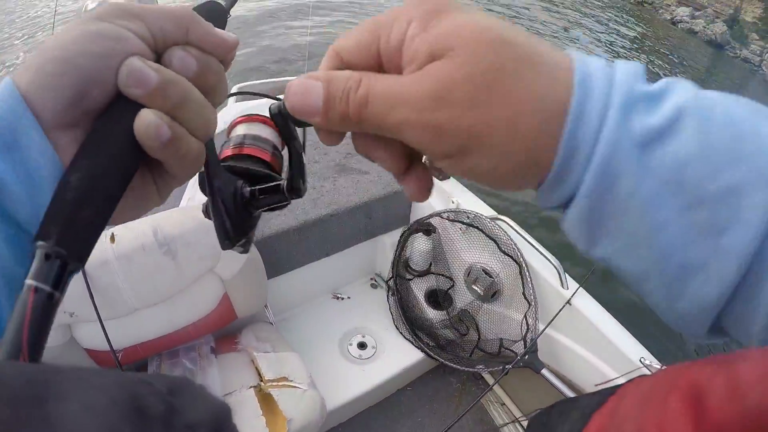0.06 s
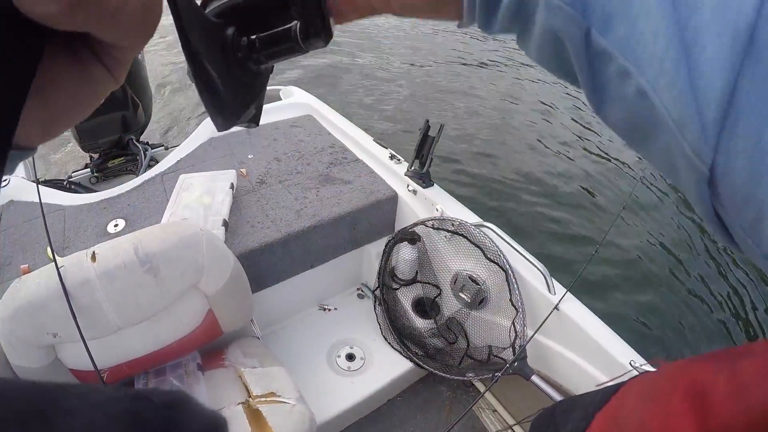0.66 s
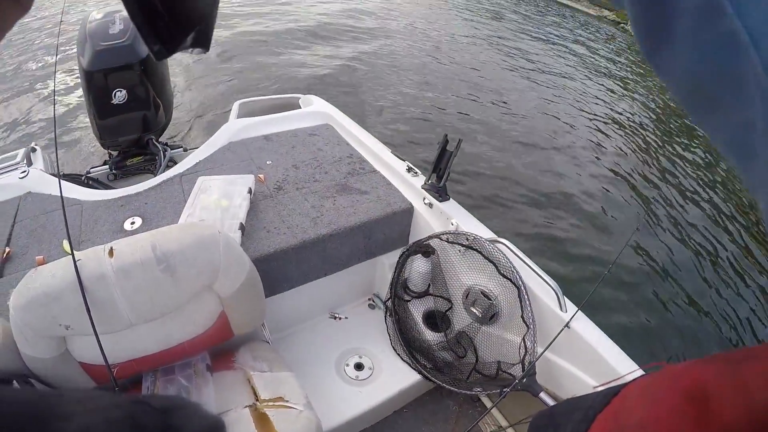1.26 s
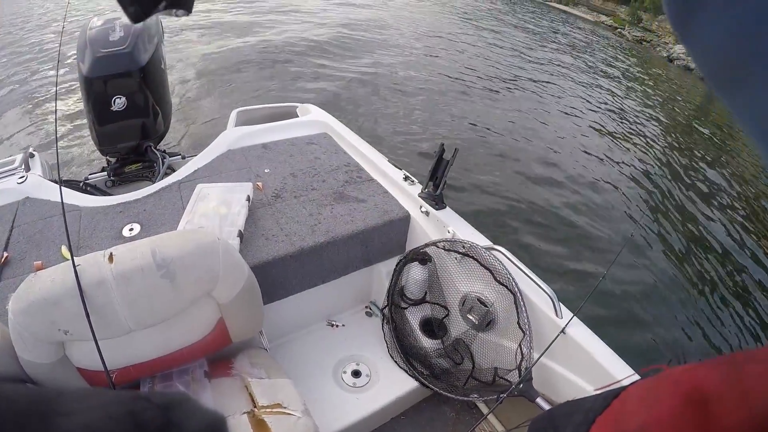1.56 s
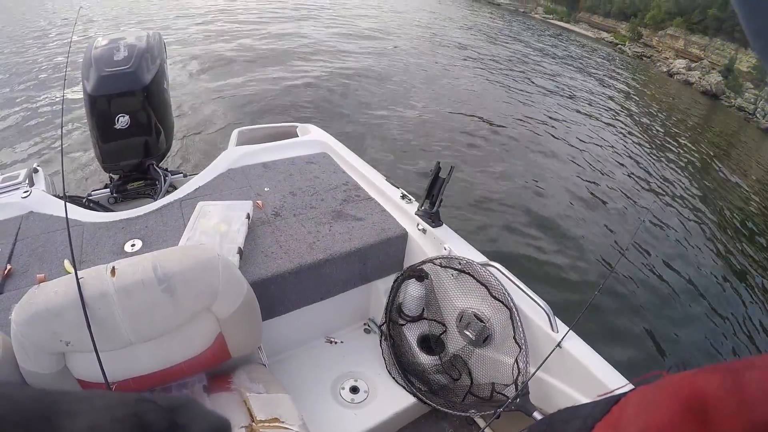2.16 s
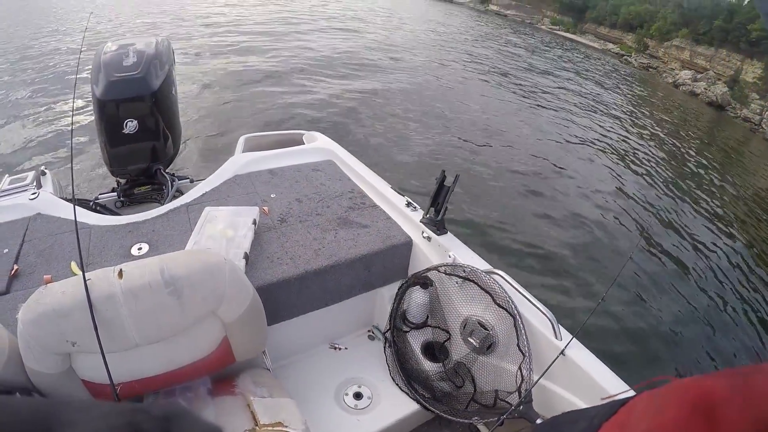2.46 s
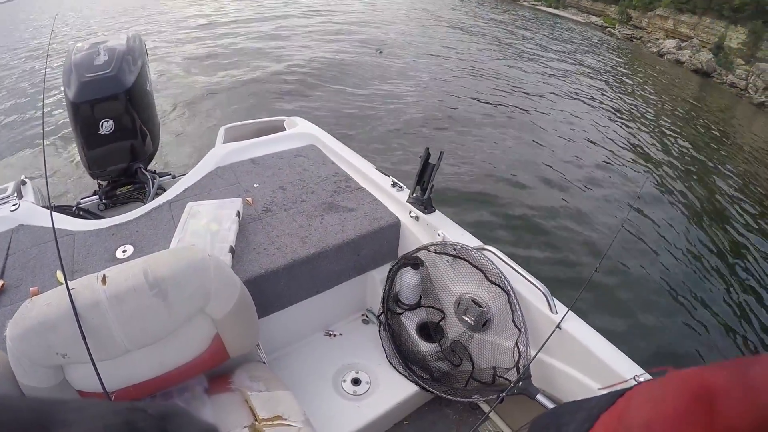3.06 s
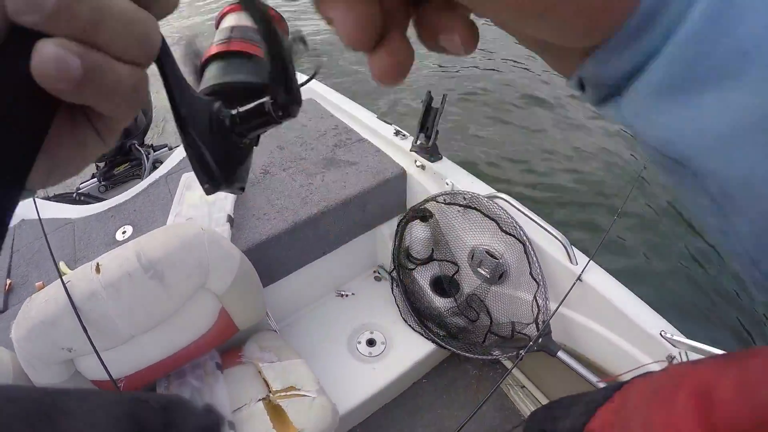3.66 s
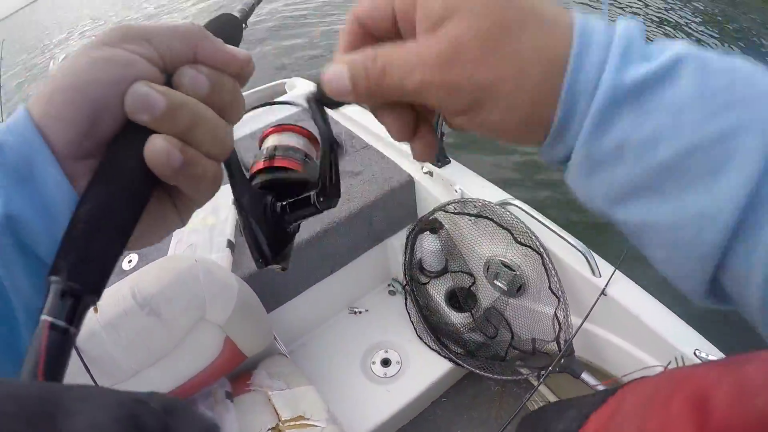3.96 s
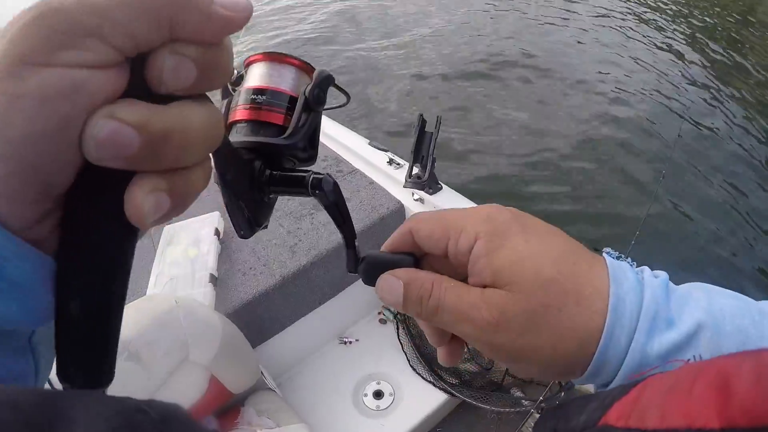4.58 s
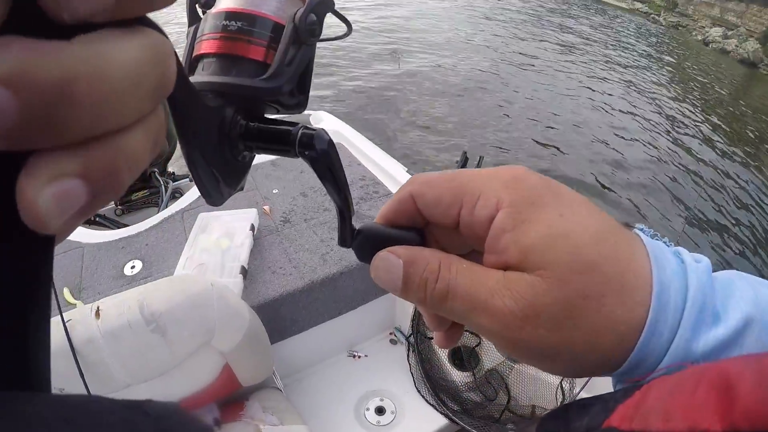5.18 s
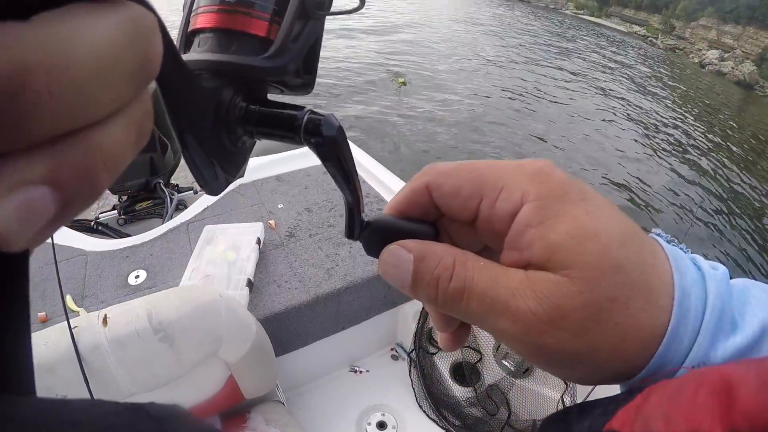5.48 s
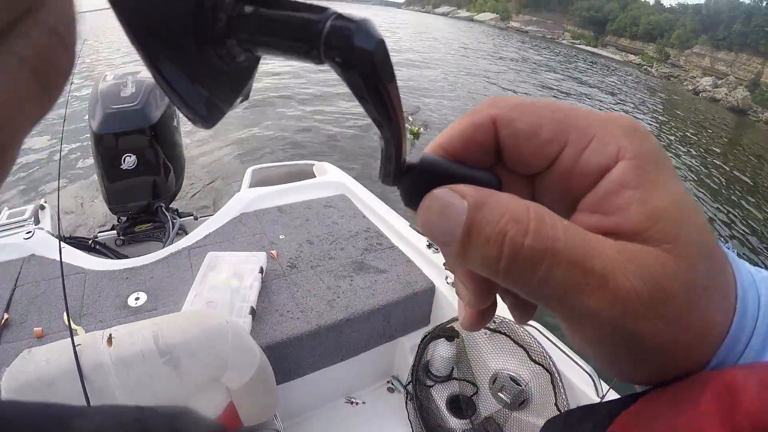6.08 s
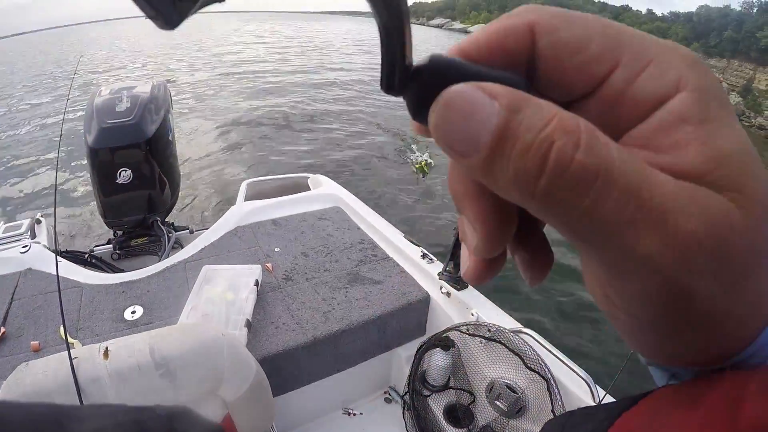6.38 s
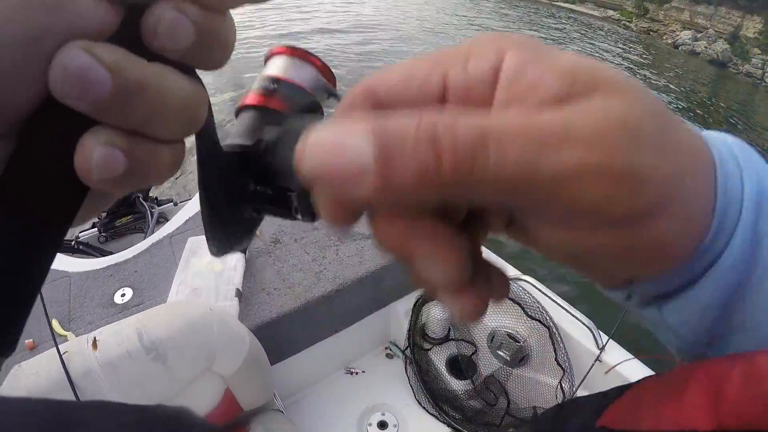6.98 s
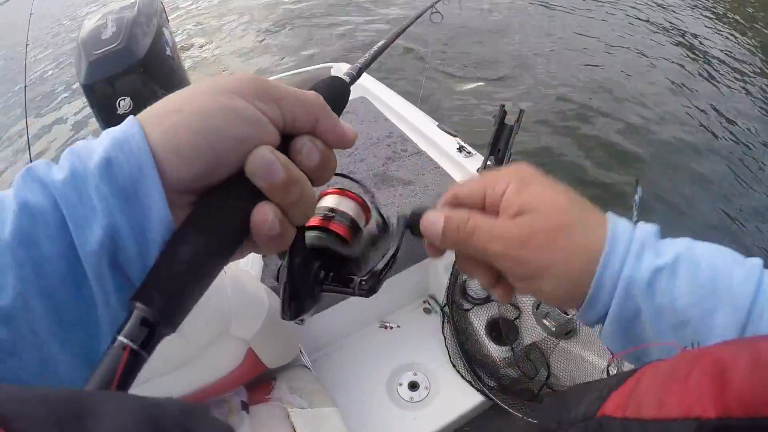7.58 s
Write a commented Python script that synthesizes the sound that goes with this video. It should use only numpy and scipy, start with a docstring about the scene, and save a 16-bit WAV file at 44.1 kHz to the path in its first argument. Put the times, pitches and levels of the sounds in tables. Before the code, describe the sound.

Close clicks and knocks from a fishing rod and reel over a slow outboard motor's steady low hum, with waves lapping and thumping the hull.

```python
"""Reeling in from a slow boat

A small fishing boat creeps over calm water: the outboard's exhaust pulses drone and burble, ripples
lap, waves slap the hull and air buffets the microphone. Close by, an angler cranks a spinning reel in
spells: gears and line whirr, small metal parts clink, the sprung bail snaps shut, and the rod grip
ticks and knocks."""
import sys
import numpy as np
from scipy import signal
from scipy.fft import rfft, irfft, next_fast_len
from scipy.io import wavfile
from scipy.ndimage import uniform_filter1d

SR = 44100
rng = np.random.default_rng(int(sys.argv[2]) if len(sys.argv) > 2 else 0)


def to_wav(sig):
    """Store sig (one row per channel, or 1-D mono) as 16-bit WAV at the path in sys.argv[1].

    Samples outside -1..1 are clipped; the rate is SR.
    """
    pcm = np.clip(np.atleast_2d(sig), -1, 1) * 32767
    pcm = np.round(pcm).astype(np.int16)
    wavfile.write(sys.argv[1], SR, pcm.T)  # frames by channels


N = 345744
TIME = np.arange(N) / SR
HIT_TIME = TIME[:SR // 2]   # half a second for each struck sound
TURNS_PER_S = 2.7   # pace of the reel's handle
RESTING_DB = -75   # whirr of the reel barely turning between spells

# Waves slapping the hull. Each row: start in seconds, level of the plop in dB, pitch of the trapped
# air in Hz, length in seconds, level of the smaller pockets in dB relative to the plop.
SLAP_WAVES = [(0.765, -42.5, 419, 0.035, 5), (1.204, -36, 288, 0.014, -7), (1.647, -46, 414, 0.046, 6),
              (2.278, -38, 404, 0.0105, 1), (3.367, -29.5, 255, 0.039, -8), (3.893, -22.5, 456, 0.026, 2.5),
              (5.046, -33, 290, 0.027, 3.5), (5.063, -35.5, 314, 0.016, 2.5),
              (5.484, -32.5, 280.6, 0.024, 0.5), (6.495, -40, 261, 0.041, 8), (6.935, -46, 467, 0.029, 0),
              (7.747, -32, 241, 0.04, 4.5)]


def from_db(db):
    """Decibels to gain."""
    return 10 ** (np.asarray(db) / 20)


def rms_one(x):
    """Scale to rms 1."""
    return x / np.sqrt(np.mean(x ** 2) + 1e-20)


def peak_one(x):
    """Scale so that the loudest millisecond has rms 1."""
    return x / np.sqrt(uniform_filter1d(x ** 2, size=44).max() + 1e-20)


def in_time(rows):
    """Join (seconds, value) rows by straight lines."""
    return np.interp(TIME, *np.transpose(rows))


def swells(rows):
    """Bell-shaped rises and falls from (centre in seconds, length in seconds, dB) rows."""
    return sum(from_db(db) * np.exp(-2 * ((TIME - s) / length) ** 2) for s, length, db in rows)


def held(start, end, attack, release):
    """Envelope that rises from start, holds until end and then falls; all in seconds."""
    return np.clip((TIME - start) / attack, 0, 1) * np.clip(1 - (TIME - end) / release, 0, 1)


def dying(t60):
    """Envelope that loses 60 dB in t60 seconds."""
    return np.exp(-np.log(1000) * np.minimum(HIT_TIME / t60, 5))


def drift(rate_hz):
    """Smooth random wander with spread 1."""
    hop, run_in = 40, 2000
    pole = np.exp(-2 * np.pi * rate_hz * hop / SR)
    noise = rng.standard_normal(N // hop + run_in + 2)
    slow = signal.lfilter([1], [1, -2 * pole, pole * pole], noise)[run_in:]
    return np.interp(np.arange(N) / hop, np.arange(len(slow)), rms_one(slow))


def grains(per_s, spread_db):
    """Random clicks of uneven size."""
    sizes = from_db(spread_db * np.minimum(rng.exponential(1, N), 4)) * rng.choice([-1, 1], N)
    return sizes * (rng.random(N) < per_s / SR)


def cut(x, hz, kind, order):
    """Butterworth high- or low-pass."""
    return signal.sosfilt(signal.butter(order, hz, kind, fs=SR, output="sos"), x)


def coloured(x, spectrum):
    """Equalise x along (Hz, dB) points, rolling off below the lowest; rms 1."""
    size = next_fast_len(len(x))
    log_hz = np.log(np.fft.rfftfreq(size, 1 / SR) + 1e-9)
    points_hz, db = np.transpose(sorted(spectrum))
    roll_off = np.minimum(np.exp(log_hz) / points_hz[0], 1) ** 2
    curve = from_db(np.interp(log_hz, np.log(points_hz), db))
    return rms_one(irfft(rfft(x, size) * roll_off * curve, size)[:len(x)])


def resonate(x, hz, width_hz):
    """One resonance with gain 1 at its peak."""
    radius = np.exp(-np.pi * width_hz / SR)
    feedback = [1, -2 * radius * np.cos(2 * np.pi * hz / SR), radius ** 2]
    return signal.lfilter(np.array([1, 0, -1]) * (1 - radius ** 2) / 2, feedback, x + 1e-18)


def ringing(modes, uneven_db):
    """Struck modes from (Hz, dB, t60 in seconds) rows, each with a random sign and uneven strength."""
    out = np.zeros(len(HIT_TIME))
    for hz, db, t60 in modes:
        strength = rng.choice([-1, 1]) * from_db(db + uneven_db * rng.standard_normal())
        out += strength * dying(t60) * np.sin(2 * np.pi * hz * HIT_TIME)
    return out


def contact(body, t60):
    """A brief rough contact heard through slightly detuned resonances: (Hz, width in Hz, dB) rows."""
    force = rng.standard_normal(len(HIT_TIME)) * dying(t60)
    out = np.zeros(len(HIT_TIME))
    for hz, width, db in body:
        detune = 1 + 0.011 * rng.uniform(-0.71, 1)
        out += from_db(db) * rms_one(resonate(force, hz * detune, width))
    return peak_one(out)


def add(out, start_s, sound):
    """Mix a sound in at its start time."""
    at = max(round(start_s * SR), 0)
    out[at:at + len(sound)] += sound[:N - at]


def wind():
    """Air buffets the microphone: soft lumps of low turbulence over a light breeze."""
    # Buffets. Each row: centre in seconds, length in seconds, level in dB.
    buffets = [(1.426, 0.2, -34.5), (3.05, 0.094, -40), (4.999, 0.098, -33), (7.17, 0.17, -31)]
    breeze_db = -47
    rumble = cut(rng.standard_normal(N), 47.4, "low", order=6)
    rumble = rms_one(cut(rumble, 20, "high", order=2))
    return np.hypot(swells(buffets), from_db(breeze_db)) * rumble


def water():
    """An uneven wash with flurries of small, briefly ringing bubbles; it swells around each slap."""
    # Colour of the water along the hull. Each row: frequency in Hz, spectral level in dB.
    wash_colour = [(150, -19), (300, 7), (600, -2.5), (950, 0.5), (1120, -7), (1400, -10.5), (2200, -13),
                   (3600, -17), (4200, -25), (6400, -24), (7300, -30.5), (10500, -31), (12500, -36),
                   (15000, -57)]
    # Fader curve of the water. Each row: time in seconds, level in dB.
    wash_fader = [(0.0, -47.5), (0.94, -47.5), (1.57, -48.5), (2.8, -48.5), (3.55, -45.5), (4.2, -45.5),
                  (4.37, -49), (4.67, -45.5), (5.26, -47), (6.0, -45), (6.66, -43), (7.27, -46.5),
                  (7.84, -44)]
    surge_s, under_slap_db, surge_max_db = 0.029, 18.5, -45
    flicker = from_db(1.7 * drift(18))
    wash = coloured(rng.standard_normal(N) * flicker, wash_colour)
    flurries = from_db(1.8 * drift(12))
    bubbles = sum(resonate(grains(11, spread_db=2.5), hz, hz / 12) for hz in np.geomspace(280, 1120, 16))
    fizz = rms_one(cut(flurries * bubbles, 1060, "low", order=4))
    surges = swells([(s, surge_s, min(db - under_slap_db, surge_max_db)) for s, db, *_ in SLAP_WAVES])
    lapping = from_db(in_time(wash_fader) + drift(5))
    return np.hypot(lapping, surges) * (from_db(-2.5) * wash + from_db(-6) * fizz)


def hull_slaps():
    """Each wave traps air: one pocket plops, smaller ones follow; heavy waves set the hull booming."""
    # Smaller air pockets. Each row: delay as a share of the slap's length, pitch ratio, level in dB.
    pockets = [(0, 1.1, 2), (.02, 1.5, -14), (.05, 2.0, -4.5), (.2, 1.5, -5.5), (.35, 0.74, 0.5),
               (.75, 1.25, -4), (0.998, 0.856, -2.5)]
    # Hull booms. Each row: start in seconds, level in dB, seconds for which the wave drives the hull.
    booms = [(3.905, -17.5, 0.19), (5.059, -21, 0.019), (7.747, -21.5, 0.046)]
    # Modes of the hull. Each row: frequency in Hz, level in dB, t60 in seconds.
    hull_modes = [(115, -5, 0.21), (123.3, 2.5, 0.25), (153.7, -3, 0.36), (348, -20, 0.094),
                  (410, -17, 0.048)]
    out = np.zeros(N)
    for start, db, hz, length, pockets_db in SLAP_WAVES:
        age = HIT_TIME / length
        plop = peak_one(np.sin(2 * np.pi * hz * HIT_TIME) * age * np.exp(-3.2 * age ** 2))
        gulp = np.zeros(N)
        for delay, ratio, pocket_db in pockets:
            pocket_hz = hz * ratio * np.exp(0.029 * rng.standard_normal())
            pocket = np.sin(2 * np.pi * pocket_hz * HIT_TIME) * dying(16 / pocket_hz)
            add(gulp, delay * length, from_db(pocket_db) * pocket)
        gulp = peak_one(gulp[:len(HIT_TIME)])
        add(out, start, from_db(db) * (plop + from_db(pockets_db) * gulp))
    for start, db, length in booms:
        push = (1 - dying(0.058)) * np.exp(-(HIT_TIME / length) ** 2)
        add(out, start, from_db(db) * push * ringing(hull_modes, uneven_db=-5))
    return cut(out, 1400, "low", order=4)


def outboard():
    """Exhaust pulses drone, unequal strokes add tones in between, and each firing kicks and puffs gas."""
    # The engine hunts around its low speed. Each row: time in seconds, pitch of the drone in Hz.
    drone_pitch = [(0.0, 59.3), (0.4, 59.4), (0.85, 61.0), (1.35, 58.7), (1.7, 58.6), (2.1, 60.3),
                   (2.7, 61.3), (3.05, 59.3), (3.45, 58.8), (3.8, 60.0), (4.27, 58.7), (4.55, 60.3),
                   (5.6, 60.1), (6.05, 60.8), (6.88, 59.3), (7.45, 62.2), (7.84, 62.1)]
    # Exhaust and hull vibration. Each row: multiple of the engine cycle, rms level in dB.
    engine_orders = [(7, -53), (8, -24.6), (9, -51), (10, -41), (11, -46), (12, -47), (13, -52),
                     (14, -48.5), (15, -57), (16, -40.3), (18, -55), (19, -51.5), (20, -50.5), (21, -51.5),
                     (22, -59), (23, -57.5), (24, -45.8), (26, -58), (27, -59), (32, -54), (40, -64)]
    # Colour of the exhaust under water. Each row: frequency in Hz, spectral level in dB.
    burble_colour = [(10, 9), (22, -25), (40, 7), (62, 8.5), (105, 1.5), (135, -2.5), (165, -4.5),
                     (220, -2.5), (330, -10.5), (470, -11.5), (700, -49), (1500, -55)]
    drone_order, puff_swing_db, kick_db = 8, 6, -3
    firing_phase = 2 * np.pi * np.cumsum(in_time(drone_pitch)) / SR
    drone = np.zeros(N)
    for order, db in engine_orders:
        # The drone's own harmonics rise together as one steep front; the other tones lie at random.
        offset = rng.uniform(0, 2 * np.pi) * (order % drone_order > 0)
        drone += np.sqrt(2) * from_db(db) * np.sin(order / drone_order * firing_phase + offset)
    waver = from_db(0.3 * drift(1.5))
    gas_flow = from_db(puff_swing_db * np.cos(firing_phase) + 2 * drift(24) + 1.3 * drift(6))
    puffs = rms_one(rng.standard_normal(N) * gas_flow)
    firings = np.diff(np.floor(firing_phase / (2 * np.pi)), prepend=0)
    kicks = rms_one(firings * rng.standard_normal(N))
    burble = coloured(puffs + from_db(kick_db) * kicks, burble_colour)
    return drone * waver + from_db(-40.3) * burble


def sleeve():
    """Cloth slides on cloth as the arm turns the crank."""
    # Swishes. Each row: centre in seconds, length in seconds, level in dB.
    swishes = [(6.55, 0.078, -60), (7.0, 0.09, -60.5), (7.19, 0.06, -53)]
    # Colour of the cloth. Each row: frequency in Hz, spectral level in dB.
    cloth_colour = [(1200, -32), (1800, -5), (2700, 9), (3700, 2), (4600, -3), (5700, 8), (6500, -13),
                    (7500, -28), (11000, -16), (15000, -23)]
    friction = rng.standard_normal(N) * from_db(2 * drift(29.7))
    return swells(swishes) * coloured(friction, cloth_colour)


def faint_ticks(crank):
    """Chance ticks of the handled reel, stronger while it is cranked, as rows for grip_ticks."""
    per_s, body_db, crack_db, spread_db = 4.2, -55.5, -70.5, 2
    follow = 0.7   # share of the whirr's rise above rest that the ticks take on
    rows = []
    for when, size, pitch in rng.random((round(per_s * N / SR), 3)):
        at = int(when * N)
        lift_db = follow * (20 * np.log10(crank[at]) - RESTING_DB) + spread_db * (2 * size - 1)
        hz = np.interp(pitch, (0, 1), (1670, 3767))
        rows.append((at / SR, body_db + lift_db, hz, crack_db + lift_db))
    return rows


def grip_ticks(crank):
    """Plastic of grip and reel ticks: the mode nearest the contact stands out over a scuff and a crack."""
    # Ticks. Each row: start in seconds, body level in dB, strongest resonance in Hz, crack level in dB.
    ticks = [(.4985, -45.5, 2010, -61), (.612, -48, 2020, -66), (0.668, -44, 2660, -56),
             (0.734, -40, 3515, -56), (.77, -46, 1575, -59), (0.775, -44, 2480, -63),
             (0.8495, -46.5, 1560, -56), (1.4645, -47, 1550, -56.5), (1.7918, -49.5, 1600, -58),
             (2.021, -47, 1684, -62), (2.589, -51, 3360, -57), (2.61, -46, 3420, -52),
             (2.709, -38, 2396, -53), (2.722, -40, 3940, -48), (2.74, -35, 3704, -58),
             (2.8815, -38, 3583, -66), (2.899, -41, 1574, -57), (2.92, -29, 2120, -51),
             (2.937, -46, 2900, -60), (2.9524, -47, 1900, -58), (2.9812, -46, 1770, -62),
             (3.009, -40, 2628, -55), (3.017, -41, 2940, -51), (3.0225, -27, 2560, -36.5),
             (3.1376, -46.5, 3800, -49), (3.4998, -34, 1990, -64), (4.873, -44, 1710, -51),
             (5.127, -48.5, 2520, -60), (5.3442, -45.5, 3200, -53.5), (5.4801, -39.5, 2315, -59),
             (5.551, -51, 2610, -61), (5.68, -44, 2270, -56), (6.0628, -44, 2900, -56),
             (6.131, -44, 2236, -50), (6.271, -44, 3370, -64), (6.468, -42, 3190, -49),
             (6.476, -38, 3285, -47), (6.54, -47, 3360, -60), (6.626, -39, 3510, -63),
             (6.668, -38, 3380, -64), (6.708, -41, 2640, -55), (6.744, -34, 3290, -50),
             (6.762, -34, 3440, -47), (6.793, -35, 3400, -56), (6.839, -47, 2100, -49),
             (6.857, -38, 1900, -60), (6.867, -46, 3600, -46), (6.897, -36.5, 2150, -47),
             (7.154, -59, 2380, -61), (7.2955, -44, 2240, -49.5), (7.342, -40, 3950, -52),
             (7.357, -38, 2100, -62), (7.403, -35.5, 3600, -47), (7.459, -45, 1900, -52),
             (7.5232, -32.5, 1850, -46), (7.5472, -40, 1750, -51), (7.61, -46, 3330, -64),
             (7.808, -45, 1730, -51.5)]
    # Modes of the plastic body. Each row: frequency in Hz, level in dB, t60 in seconds.
    plastic_modes = [(1720, -7.5, 0.0083), (2250, -8.5, 0.0059), (3097, -6.5, 0.0098), (3580, -7, 0.013)]
    # Resonances of the bright crack. Each row: frequency in Hz, width in Hz, level in dB.
    crack_bands = [(4900, 1500, 13), (6000, 830, 3), (7700, 1800, -12), (11600, 2000, -13)]
    note_db, note_t60, scuff_db = 2, 0.008, -3.5
    bodies, cracks = np.zeros((2, N))
    for start, body_db, hz, crack_db in ticks + faint_ticks(crank):
        other_modes = [mode for mode in plastic_modes if abs(mode[0] - hz) > 300]
        ring = ringing(other_modes + [(hz, note_db, note_t60)], uneven_db=1)
        struck = peak_one(ring * (1 - dying(0.004)))
        scuff = contact([(2830, 1800, 0)], t60=0.02)
        add(bodies, start, from_db(body_db + 1) * (struck + from_db(scuff_db) * scuff))
        add(cracks, start, from_db(crack_db + 2.5) * contact(crack_bands, t60=0.02))
    bodies = cut(cut(bodies, 1000, "high", order=2), 4070, "low", order=6)
    cracks = cut(cut(cracks, 3200, "high", order=2), 11500, "low", order=2)
    return bodies + cracks


def rod_knocks():
    """A light knock on the butt sounds one hollow note; a hard one adds other modes and a bright snap."""
    # Knocks. Each row: start in seconds, level in dB, pitch of the hollow note in Hz.
    knocks = [(1.791, -39, 1020), (2.277, -36, 650), (5.146, -35, 865), (5.48, -31, 930), (6.743, -36, 930),
              (7.516, -38, 1250), (7.5237, -23.5, 1090), (7.537, -36, 1250), (7.5476, -24, 1100),
              (7.681, -33, 960), (7.7362, -27.5, 600), (7.7728, -29.5, 930)]
    # Modes of the rod butt. Each row: frequency in Hz, level in dB, t60 in seconds.
    butt_modes = [(680, 4, 0.012), (1280, 0, 0.011), (1750, -7, 0.006)]
    bodies, snaps = np.zeros((2, N))
    for start, db, hz in knocks:
        note = peak_one(np.sin(2 * np.pi * hz * HIT_TIME) * dying(0.016) * (1 - dying(0.012)))
        butt = peak_one(ringing(butt_modes, uneven_db=1) * (1 - dying(0.0072)))
        hardness = from_db(0.9 * (db + 25))
        add(bodies, start, from_db(db - 1.5) * (note + hardness * butt))
        add(snaps, start, from_db(db - 23) * hardness * contact([(10300, 3000, 0)], t60=0.0092))
    return cut(bodies, 1750, "low", order=4) + snaps


def squeaks():
    """Faint, thin tones with a rough, unsteady pitch, perhaps from the crank knob."""
    # Squeaks. Each row: centre in seconds, length in seconds, pitch in Hz, peak level in dB.
    tones = [(5.415, 0.017, 8200, -71), (5.646, 0.032, 10640, -66), (5.66, .022, 5970, -60),
             (5.705, .03, 7600, -65), (5.752, 0.011, 9300, -64), (6.91, .02, 11300, -63),
             (7.02, .025, 11400, -67), (7.13, .04, 11900, -74), (7.717, 0.12, 11400, -71)]
    wavering_time = np.cumsum(1 + 0.025 * drift(200)) / SR
    return sum(swells([(centre, length, db)]) * np.sin(2 * np.pi * hz * wavering_time)
               for centre, length, hz, db in tones)


def line_rasp():
    """Taut line sticks and slips on the roller, harder as the tension builds, then comes free."""
    # Pulls on the line. Each row: start in seconds, end in seconds, level at the end in dB.
    pulls = [(0.634, 0.765, -60.5), (6.238, 6.797, -50)]
    # Resonances of the line roller, each in Hz.
    roller_hz = (2820, 3080, 3380, 3150, 3440)
    rise_db_per_s, edge_s = 17, 0.027
    tension = np.zeros(N)
    for start, end, db in pulls:
        build_up = from_db(db - rise_db_per_s * np.maximum(end - TIME, 0))
        tension += build_up * held(start, end, attack=edge_s, release=edge_s)
    slips = sum(resonate(grains(per_s=110, spread_db=2.5), hz, width_hz=110) for hz in roller_hz)
    return tension * rms_one(resonate(slips, 2700, width_hz=3000))


def metal_clinks():
    """Light metal touches on the reel: a sharp tick, a thin top ring and the bail wire's longer ring."""
    # Clinks. Each row: start in seconds, level in dB, then trims for wire ring and top ring in dB.
    clinks = [(.006, -29, -5, 8), (0.069, -30, -1, -1), (0.1003, -30, -5, -5), (0.1334, -30.5, -3, -10),
              (0.2577, -32, -8, 3), (1.3319, -20, -15, -11), (4.1338, -32, -8, 3), (4.188, -31.5, -9, 0),
              (4.2404, -32.5, 2, 2), (4.269, -31.5, 1.5, 0)]
    # Modes of the bail wire. Each row: frequency in Hz, level in dB, t60 in seconds.
    wire_modes = [(4770, -18, 0.19), (6450, -31, 0.22), (10280, -31, 0.15)]
    # Resonances of the tick. Each row: frequency in Hz, width in Hz, level in dB.
    tick_bands = [(2070, 500, 5), (3650, 420, 12), (4950, 1000, 8.5), (6700, 2000, 6), (8800, 1600, 0),
                  (10400, 420, 3.5), (13700, 710, 8)]
    out = np.zeros(N)
    for start, db, wire_db, top_db in clinks:
        wire = from_db(wire_db) * ringing(wire_modes, uneven_db=2)
        top = from_db(top_db - 7) * ringing([(13400, -5, 0.04), (13490, -12, 0.06)], uneven_db=1)
        tick = from_db(-3) * contact(tick_bands, t60=0.011)
        add(out, start, from_db(db) * (tick + wire + top))
    return cut(out, 2200, "high", order=2)


def bail_snap():
    """The sprung bail clatters against its stop and rings the whole reel; its soft rebounds are duller."""
    # The bail touches, shuts and rebounds. Each row: start in seconds, level in dB, low-pass in Hz.
    hits = [(4.489, -48, 9000), (4.497, -26.5, 18000), (4.568, -49.5, 9000), (4.5972, -43, 6500)]
    # Colour of the clatter. Each row: frequency in Hz, spectral level in dB.
    clatter_colour = [(330, -2), (550, -4), (900, 1), (1400, -2), (2400, 4), (3800, 4), (4500, -4),
                      (6300, -2), (7300, -11), (10000, -8), (13000, -16), (14800, -8), (15200, -18)]
    # Modes of the reel. Each row: frequency in Hz, level in dB, t60 in seconds.
    reel_modes = [(800, -3, 0.083), (1070, -5, 0.28), (2120, -20, 0.021), (2380, -28, 0.071),
                  (2640, -9, 0.049), (3250, -18, 0.063), (3760, -3, 0.035), (3860, -2, 0.076),
                  (4910, -7, 0.073), (5720, -4, 0.055), (6440, 2, 0.029), (6700, -14, 0.037),
                  (8000, -12, 0.089), (8700, -21, 0.066), (9050, -9, 0.038), (10570, -23, 0.043),
                  (11300, -20, 0.068), (12200, -19, 0.076), (14500, -5, 0.036)]
    out = np.zeros(N)
    for start, db, bright_hz in hits:
        rattle = 1.6 * coloured(rng.standard_normal(len(HIT_TIME)), clatter_colour) * (1 - dying(0.003))
        dull = cut(rattle, 4500, "low", order=1)
        clatter = dull * dying(0.072) + (rattle - dull) * dying(0.052)   # the treble dies first
        ring = from_db(-1) * peak_one(ringing(reel_modes, uneven_db=0.5) * (1 - dying(0.012)))
        add(out, start, from_db(db) * cut(clatter + ring, bright_hz, "low", order=2))
    return out


def loose_part():
    """A loose metal part shivers against the fast-spinning reel: tiny touches ring one high mode."""
    # Shivers. Each row: centre in seconds, length in seconds, level in dB.
    shivers = [(3.35, 0.28, -74), (3.8, 0.26, -72), (4.1, 0.069, -65), (6.6, 0.37, -78), (7.5, 0.2, -66)]
    touches = grains(per_s=70, spread_db=2)
    return swells(shivers) * rms_one(resonate(touches, 13400, width_hz=150))


def cranking():
    """Strength of the whirr: in each spell the rotor spins up, sways with each turn and runs out."""
    # Spells of cranking. Each row: start in seconds, end in seconds, level in dB.
    spells = [(-.2, 0.001, -54.5), (0.201, 0.855, -70), (2.218, 2.613, -65.5), (3.126, 4.096, -56.5),
              (4.498, 5.148, -68), (5.437, 5.936, -65.5), (6.014, 7.625, -57)]
    sway_db = 1
    power = sum((from_db(db) * held(start, end, attack=0.1, release=0.28)) ** 2
                for start, end, db in spells)
    sway = from_db(sway_db * np.sin(2 * np.pi * TURNS_PER_S * TIME))
    return np.sqrt(power * sway ** 2 + from_db(RESTING_DB) ** 2)


def running_line():
    """The line runs unevenly: a fine, fluttering grain."""
    # Colour of the line's whirr. Each row: frequency in Hz, spectral level in dB.
    line_colour = [(500, -1), (1000, 7), (1500, -5), (2600, 9), (3700, 4), (4400, 0), (6300, -4),
                   (7400, -10), (9500, -18), (11000, -10), (12300, -23), (13900, -3), (15000, -16.5)]
    flutter = from_db(1.9 * drift(40))
    return coloured(grains(per_s=1500, spread_db=2) * flutter, line_colour)


def gear_teeth():
    """One uneven click per gear tooth rings the gear case; the hand's pace wanders."""
    # Resonances of the gear case. Each row: frequency in Hz, width in Hz, level in dB.
    case_bands = [(2140, 300, -3), (2620, 160, -8), (3050, 160, -8), (3420, 160, -4), (3780, 200, -1),
                  (6000, 90, -10), (6500, 160, -14), (7890, 170, -22), (11000, 260, -24)]
    teeth_per_turn, bite_spread_db = 58, 3.5
    pace = TURNS_PER_S * np.exp(0.2 * drift(3))
    bites = np.diff(np.floor(np.cumsum(pace) * teeth_per_turn / SR), prepend=0)
    force = bites * from_db(bite_spread_db * np.clip(rng.standard_normal(N), -2, 2))
    case = sum(from_db(db) * rms_one(resonate(force * rng.uniform(-1.06, 1, N), hz, width))
               for hz, width, db in case_bands)
    return rms_one(case)


def scene():
    """Boat and water with the tackle up close, in mono; open air gives no reverberation."""
    boat = outboard() + water() + hull_slaps() + wind()
    crank = cranking()
    whirr = crank * running_line() + loose_part() + from_db(-2) * crank * gear_teeth()
    rubbing = line_rasp() + squeaks() + sleeve()
    impacts = metal_clinks() + bail_snap() + rod_knocks() + grip_ticks(crank)
    return (boat + whirr + rubbing + impacts)[None]


def record(dry):
    """A steep low-pass takes off the very top."""
    cutoff_hz = 15300
    return signal.sosfilt(signal.ellip(10, 0.2, 80, cutoff_hz, fs=SR, output="sos"), dry)


dry = scene()
out = record(dry)
to_wav(out)
```